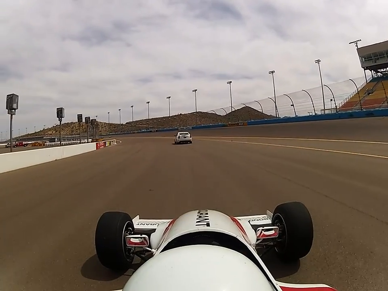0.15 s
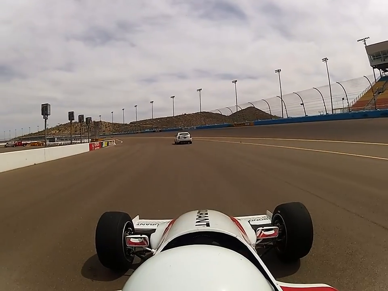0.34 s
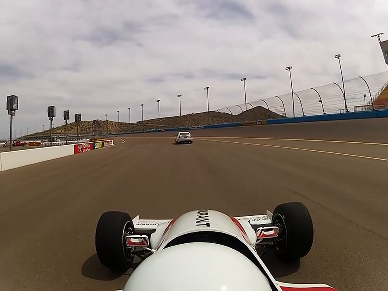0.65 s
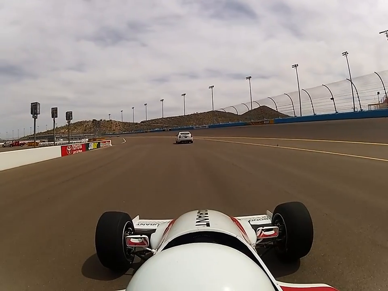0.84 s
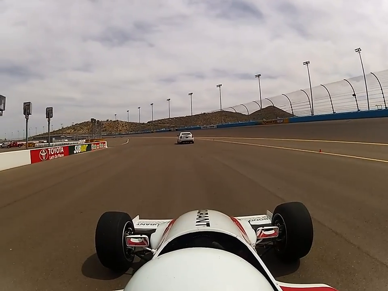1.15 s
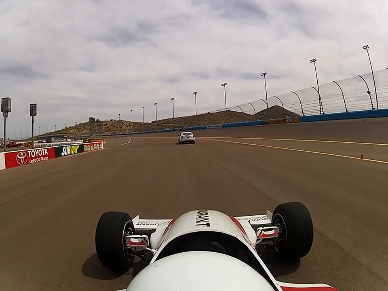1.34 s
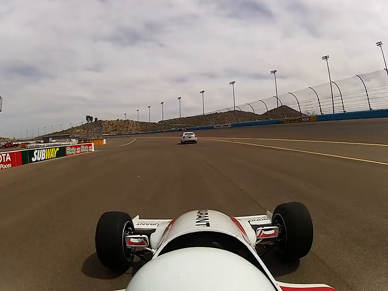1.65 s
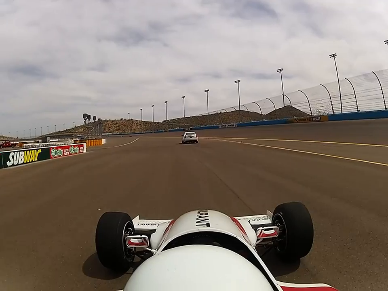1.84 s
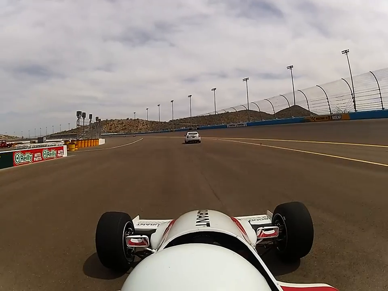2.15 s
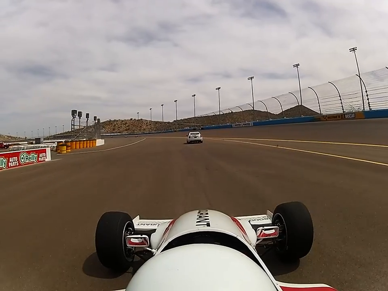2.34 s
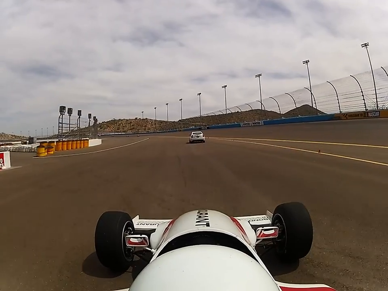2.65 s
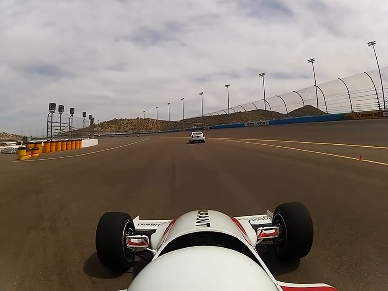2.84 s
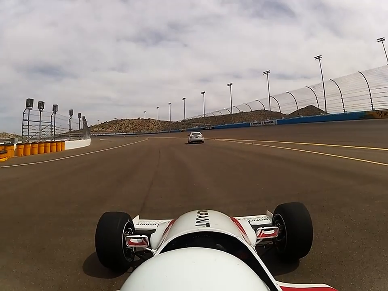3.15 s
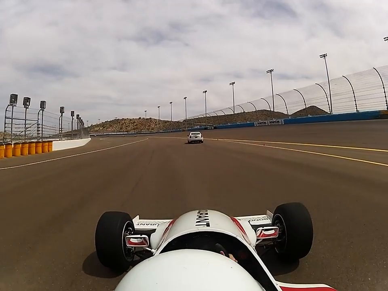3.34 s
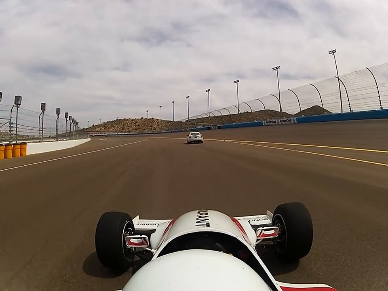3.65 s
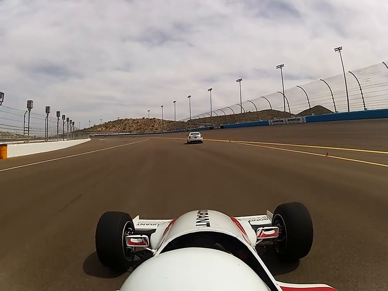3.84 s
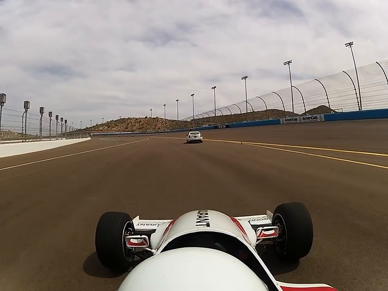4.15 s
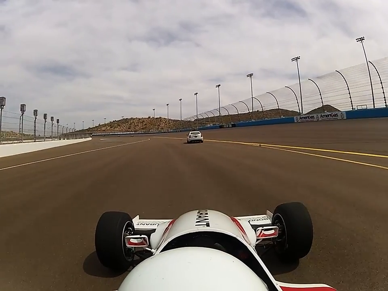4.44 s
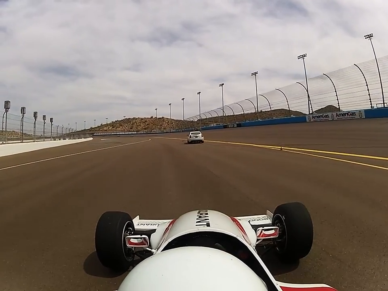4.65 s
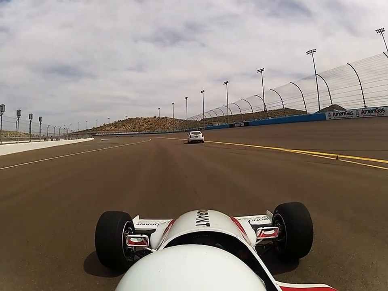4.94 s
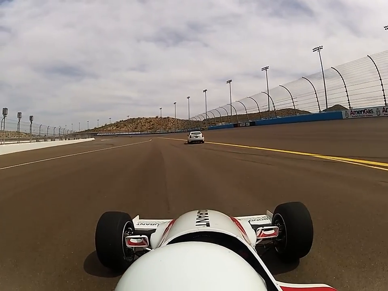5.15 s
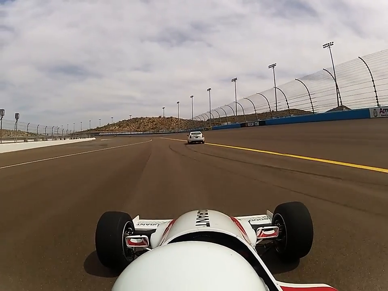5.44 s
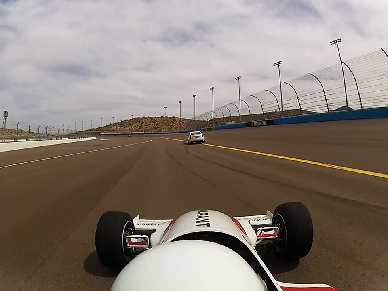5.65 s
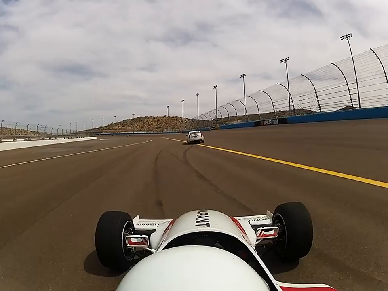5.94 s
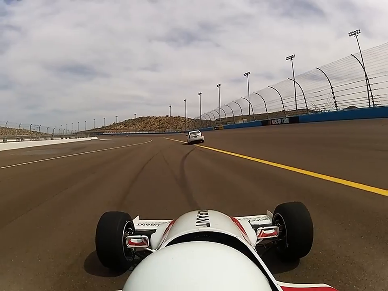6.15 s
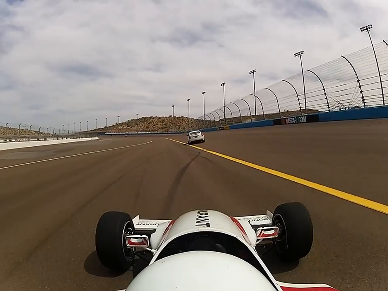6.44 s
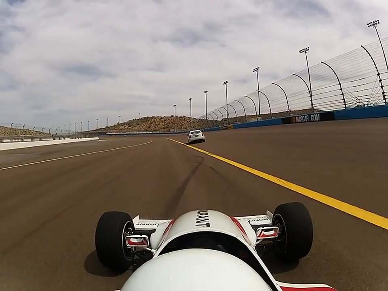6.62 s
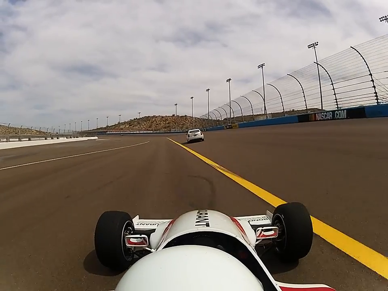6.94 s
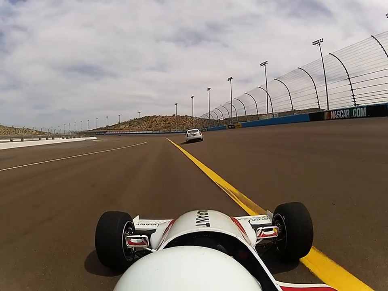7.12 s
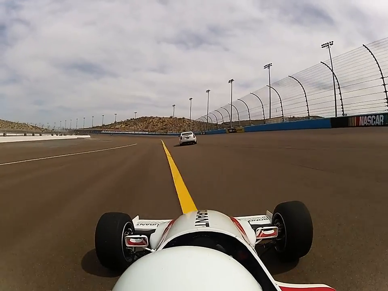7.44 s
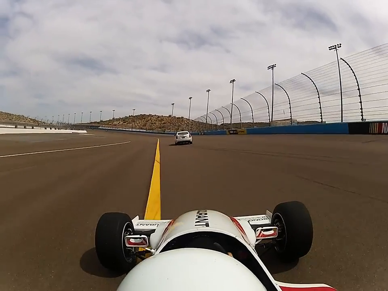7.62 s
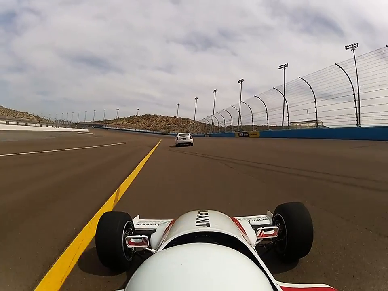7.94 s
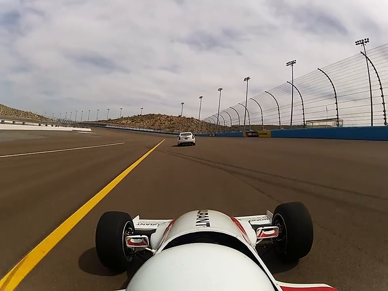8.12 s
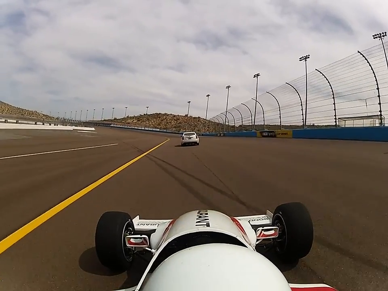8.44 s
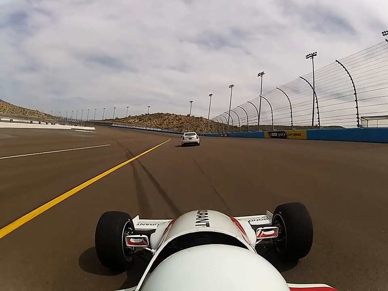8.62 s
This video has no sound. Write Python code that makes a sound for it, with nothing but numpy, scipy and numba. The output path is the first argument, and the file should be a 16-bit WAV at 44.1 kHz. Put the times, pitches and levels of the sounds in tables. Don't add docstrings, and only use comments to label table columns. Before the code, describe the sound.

From a small enclosed camera mounted on an open single-seat race car, dense wind roar and chassis rattle cover a low humming engine. The pitch creeps up, the throttle closes with a sharp knock near five seconds, leaving wind and rattle, then the engine bites back with a shudder and holds a lower, steady drone. Irregular bumps knock the mount throughout.

```python
import sys
import numpy as np
from scipy import signal
from scipy.fft import rfft, irfft
from scipy.io import wavfile
from scipy.ndimage import uniform_filter1d, minimum_filter1d
from numba import njit

SR = 44100
rng = np.random.default_rng(int(sys.argv[2]) if len(sys.argv) > 2 else 0)


def log_audio(samples):
    frames = np.atleast_2d(samples).T
    limited = np.clip(frames, -1, 1)
    pcm = np.round(limited * 32767).astype(np.int16)
    wavfile.write(sys.argv[1], SR, pcm)


def level_to_linear(level):
    exponent = np.asarray(level, float) / 20
    return 10 ** exponent


N = 387198

# frequency_hz, level_db
SHELL = [(150, -23), (215, -6), (400, 1), (650, -1.5), (900, -4.5), (1500, -4.5), (2430, -2), (2600, -5),
         (3950, -12), (4120, -21.5), (4800, -32), (5400, -35), (6000, -53)]
FIZZ_HZ, TOP_HZ = 2520, 4100


def table(rows, hz):
    at_hz, db = np.transpose(rows)
    return np.interp(np.log(hz + 1), np.log(at_hz + 1), db)


def colour(x, db_at):
    size = 16384
    hz = np.arange(size // 2 + 1) * SR / size
    log_gain = db_at(hz) * np.log(10) / 20
    cepstrum = irfft(log_gain)
    cepstrum[1:size // 2] *= 2
    cepstrum[size // 2 + 1:] = 0
    response = irfft(np.exp(rfft(cepstrum)))
    return signal.fftconvolve(x, response)[:N]


def unit(x):
    return x / np.sqrt(np.mean(x ** 2))


def walk(rate):
    hold = max(int(SR / rate), 1)
    steps = np.repeat(rng.standard_normal(4000), hold)[:N]
    return unit(uniform_filter1d(uniform_filter1d(steps, hold), hold))


def split(x, hz):
    low = signal.butter(8, hz, "low", fs=SR, output="sos")
    high = signal.butter(8, hz, "high", fs=SR, output="sos")
    return signal.sosfilt(low, x), signal.sosfilt(high, x)


@njit
def follow(x, rise, fall):
    out, level = np.empty(len(x)), 0.
    for i in range(len(x)):
        level += (x[i] - level) * (rise if x[i] > level else fall)
        out[i] = level
    return out


def housing_db(hz):
    # centre_hz, width_hz, lift_db (below zero a null)
    modes = [(304.8, 63, 9.5), (328, 6.9, 3), (423.2, 49, 9), (489.3, 94, 9.5), (576.5, 100, 7.5),
             (825, 19, 7), (878, 45, -5), (995, 72, 14), (1052, 53, 12.5), (1168, 112, 8.5),
             (1378, 46, 5.5), (1740, 160, 7), (1835.3, 86, 13.5), (1990, 69, -3.5), (2234, 255, 5),
             (2152, 30, 4), (2860, 384, 9), (3000, 65, 3.5), (3420, 117, 6), (3740, 43, 8),
             (4300, 100, -2.5), (4975, 240, 6.5), (5176, 230, 16.5), (5730, 140, 13)]
    lift_db = sum(db / (1 + (2 * (hz - at_hz) / width) ** 2) for at_hz, width, db in modes)
    return table(SHELL, hz) + lift_db


def shake(shake_db, fizz_db):
    grit_size = level_to_linear(1.42 * rng.exponential(size=N))
    grit = grit_size * (rng.random(N) < 0.02) * rng.standard_normal(N)
    gusts_db = 1.05 * walk(30) + 0.57 * walk(90)
    push = (rng.standard_normal(N) + 0.45 * unit(grit)) * level_to_linear(gusts_db)
    body, treble = split(colour(push, housing_db), FIZZ_HZ)
    fizz, top = split(unit(treble), TOP_HZ)
    puffs = fizz * level_to_linear(fizz_db + walk(20))
    steady_top = top * level_to_linear(0.32 * fizz_db - 7)
    return level_to_linear(shake_db) * (unit(body) + puffs + steady_top)


def foot_off(t):
    lift_s, bite_s, shut_s, open_s = 5.04, 6.12, 0.04, 0.058
    closing = np.clip((t - lift_s) / shut_s, 0, 1)
    still_shut = np.clip((bite_s + open_s - t) / open_s, 0, 1)
    return closing * still_shut


def engine(t, off):
    # multiple of the cycle rate, feathered_db, full_throttle_db, foot_off_db
    orders = [(1, -30, -35, -60), (2, -41, -26, -60), (3, -35, -43, -60), (4, -42, -35, -60),
              (5, -42, -48, -60), (6, -38.5, -37, -39), (7, -41, -45, -60), (8, -48, -36, -60),
              (10, -46, -43, -60), (12, -42, -48, -60)]
    # time_s, rate_hz
    cycle_rate = [(0, 43.6), (.5, 44.3), (1, 44.4), (1.5, 44.2), (2.1, 44.7), (2.6, 45.2), (3, 46.1),
                  (3.6, 47.9), (4.2, 49.8), (5.03, 51.8), (5.1, 50.5), (6.1, 47.6), (6.3, 40.1),
                  (6.9, 41.2), (7.5, 41.8), (8.1, 41.9), (8.4, 41.7), (8.78, 41.5)]
    # time_s, opening (0-1)
    throttle = [(0, 0), (1.2, 0.7), (2.5, 0), (2.9, 0.5), (3.4, 1), (4.4, 1), (5.03, 0.5), (6.4, 0.88),
                (7, 1), (7.6, .7), (8.2, 0.2), (8.78, 0.4)]
    load = np.clip(np.interp(t, *np.transpose(throttle)), 0, 1)
    revs_hz = np.interp(t, *np.transpose(cycle_rate))
    turns = np.cumsum(revs_hz * (1 + 0.002 * walk(10))) / SR
    hz = np.arange(1000.)
    ring_db = 0.9 * (housing_db(hz) - table(SHELL, hz))
    hum = 0
    for order, light_db, full_db, off_db in orders:
        load_db = light_db + load * (full_db - light_db)
        level_db = load_db + off * (off_db - load_db)
        level_db = level_db + np.interp(order * revs_hz, hz, ring_db) + 1.6 * walk(4)
        phase = 2 * np.pi * (order * turns + rng.random()) + 0.045 * order * walk(14)
        hum = hum + level_to_linear(level_db) * np.sin(phase)
    return hum


def jolts(t):
    # start_s, peak_db, length_ms, brightness_db, gain_dip_db (below zero none)
    knock_list = [(0.28, -12, 5.1, 10, -2), (0.342, -5, 8.6, -10, 4), (0.639, -11, 4.4, -2, 1.5),
                  (1.143, -16, 7.4, -7, -3), (1.72, -25, 2.9, -8, 1.5), (2.157, 2, 4.9, -13, 0.5),
                  (2.689, -12, 6, 7, -4), (3.239, -5, 7, 3, -10), (3.369, -20, 6, 0, -11),
                  (3.516, -12, 13, 5, -4.5), (4.569, -13, 34, -11, 2.5), (5.026, 3, 8.1, 0.5, 11.5),
                  (5.448, 3.5, 6.8, 2.5, 6), (5.599, -9, 17, 8.5, -4), (5.615, -2, 12, -27, 3),
                  (6.251, -5, 9, -12, 5), (6.678, -12, 6, -14, 4), (6.826, -2, 7, -13, -1.5),
                  (7.089, -17, 2.1, 0, 3), (7.548, 1.5, 1.5, -13, 3.5), (8.366, 0, 12, -5, -3)]
    dull, bright, dip_db = np.zeros(N), np.zeros(N), np.zeros(N)
    for start_s, peak_db, length_ms, bright_db, depth_db in knock_list:
        since, length = t - start_s, max(length_ms, 1) / 1000
        burst = np.exp(-np.abs(since - length / 2) / (length * 0.51))
        burst = burst * (since > -0.002) * level_to_linear(peak_db - 11.5)
        dull += burst
        bright += burst * level_to_linear(bright_db)
        ducking = np.abs(since - 1.5 * length - 0.005) < 0.005
        dip_db = np.maximum(dip_db, max(depth_db, 0) * ducking)
    body, treble = split(colour(rng.standard_normal(N), housing_db), FIZZ_HZ)
    fizz, top = split(unit(treble), TOP_HZ)
    knocks = unit(body) * dull + (fizz + top * level_to_linear(9)) * bright * level_to_linear(-11)
    dip_db = follow(dip_db, 0.0038, 1 / (0.09 * SR))
    return knocks, uniform_filter1d(dip_db, size=200)


def lurch(t):
    # start_s, end_s, frequency_hz, level_db
    swings = [
        (6.15, 6.265, 54, -12.5),
        (6.13, 6.27, 23, -19),
    ]
    rocking = 0
    for start_s, end_s, hz, db in swings:
        swell = np.clip((t - start_s) / 0.024, 0, 1) * np.clip((end_s - t) / 0.024, 0, 1)
        rocking = rocking + level_to_linear(db) * swell * np.sin(2 * np.pi * hz * t)
    return rocking


def rumble(thump_db, roar_db):
    # frequency_hz, level_db
    low_spectrum = [(12, -20), (24, -14), (32, -8), (48, -1), (61, 6.5), (76, -2), (100, -2), (140, -4),
                    (170, -6), (215, -19.5), (300, -47.5)]
    noise = colour(rng.standard_normal(N), lambda hz: table(low_spectrum, hz))
    thump, roar = split(noise, 106.3)
    thump = unit(thump) * level_to_linear(thump_db + 1.6 * walk(11))
    return thump + unit(roar) * level_to_linear(roar_db + 0.56 * walk(4.6))


def scene():
    # time_s, buffeting_db
    wind = [(0, -18.5), (1, -18.5), (1.75, -17), (2.6, -18), (3.4, -16.5), (4.8, -18.5), (5.7, -19),
            (6.2, -17.5), (6.5, -18.5), (7.3, -18), (8.2, -19), (8.78, -18.5)]
    # centre_s, length_s, swell_db
    bumps = [(.8, 0.16, 0), (1.09, .05, 3), (1.65, .2, 5), (3.1, 0.8, 1.5), (4.89, 0.088, 0),
             (5.65, 0.14, 2.5), (6, .06, 8), (6.213, 0.14, 7.5), (6.407, 0.15, 2), (7.807, 0.064, 8),
             (8.29, 0.091, 7)]
    t = np.arange(N) / SR
    off = foot_off(t)
    wind_db = np.interp(t, *np.transpose(wind))
    swell_db = sum(db * np.exp(-(2 * (t - at_s) / length_s) ** 2) for at_s, length_s, db in bumps)
    bump_db = wind_db + swell_db
    fizz_db = -15.5 - 3 * off + 0.77 * (wind_db - wind_db.mean())
    thump_db = bump_db - 8 - 0.5 * off
    roar_db = bump_db - 14 - 5.5 * off
    boom, rattle = split(shake(wind_db + 1, fizz_db), 270.3)
    boom = boom * level_to_linear(-9 * off)
    knocks, dip_db = jolts(t)
    mix = boom + rattle + engine(t, off) + knocks + lurch(t) + rumble(thump_db, roar_db)
    return (mix * level_to_linear(-dip_db))[None]


def low_pass(x):
    return signal.sosfilt(signal.butter(12, 15300, fs=SR, output="sos"), x)


def record(dry):
    hold_hz, held, store_hz = 12000, 4, 48000
    peak = -minimum_filter1d(-np.abs(dry[0]), size=301)
    peak = follow(peak, 1., 1 / (0.06 * SR))
    peak = uniform_filter1d(uniform_filter1d(peak, size=150), size=150)
    tamed = dry[0] * np.minimum(0.43 / (peak + 1e-9), 1) ** 0.37
    slow = signal.resample_poly(tamed, hold_hz, SR)
    stairs = np.repeat(slow, held)
    mix = level_to_linear(0.5) * signal.resample_poly(stairs, SR, store_hz)[None, :N]
    return low_pass(mix)


dry = scene()
out = record(dry)
log_audio(out)
```